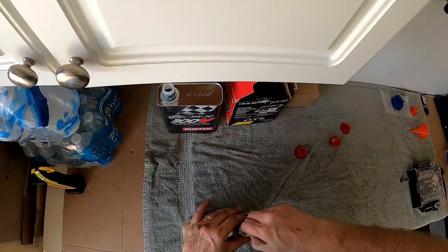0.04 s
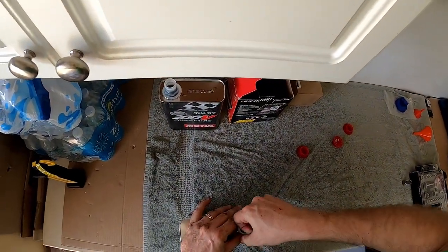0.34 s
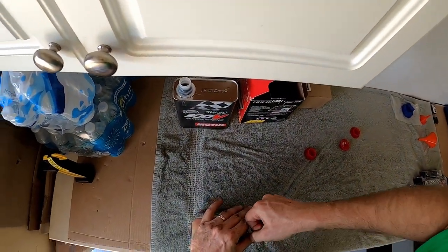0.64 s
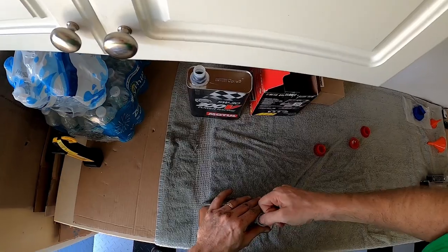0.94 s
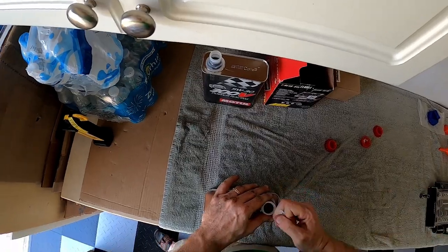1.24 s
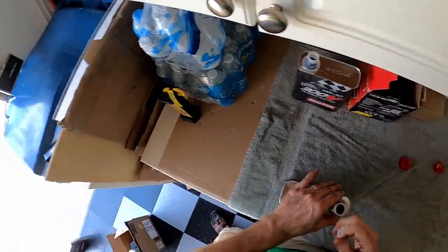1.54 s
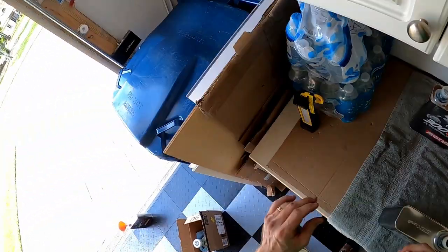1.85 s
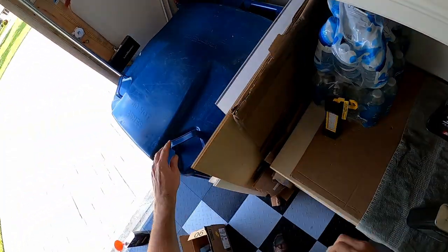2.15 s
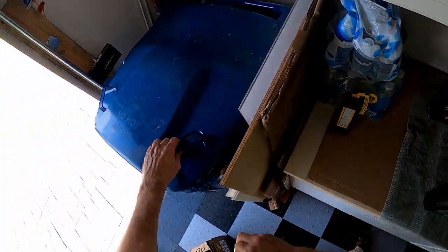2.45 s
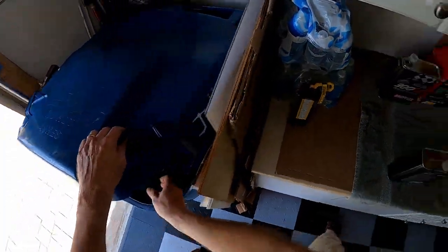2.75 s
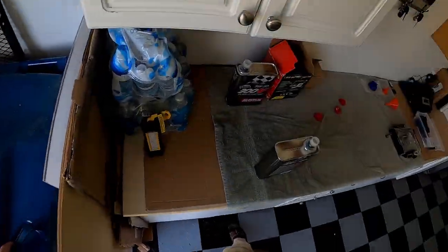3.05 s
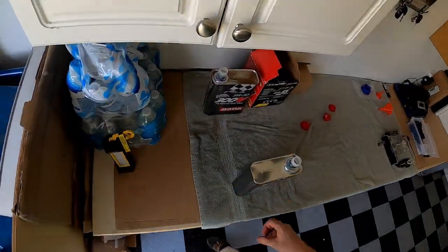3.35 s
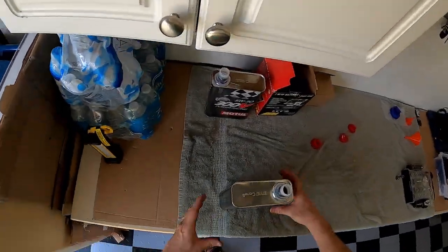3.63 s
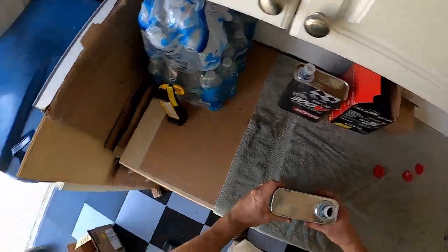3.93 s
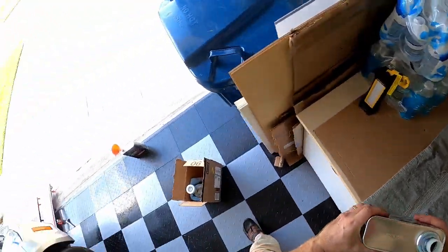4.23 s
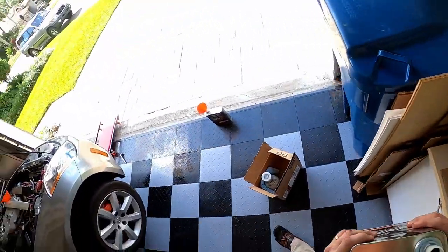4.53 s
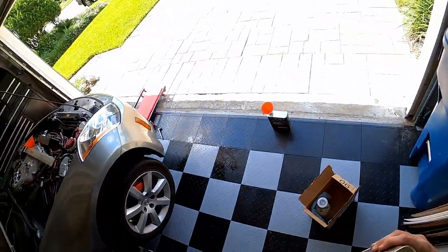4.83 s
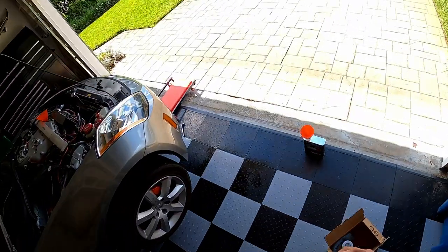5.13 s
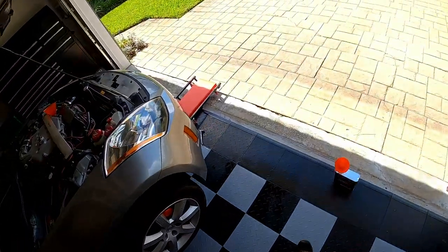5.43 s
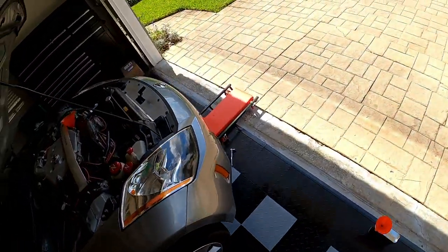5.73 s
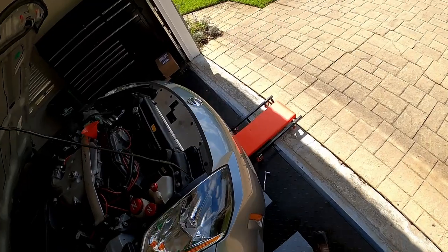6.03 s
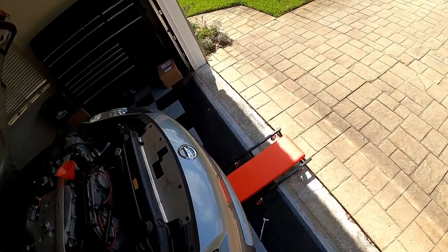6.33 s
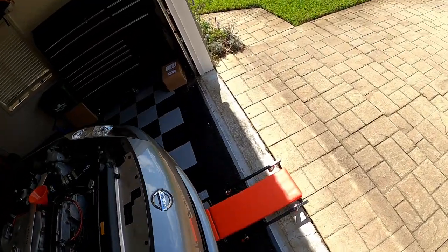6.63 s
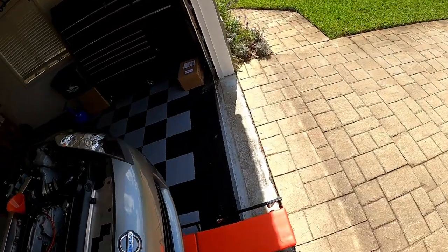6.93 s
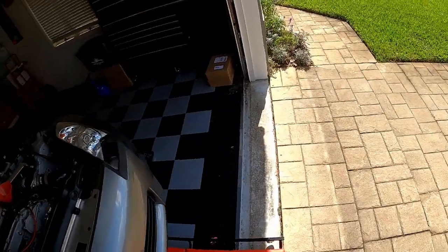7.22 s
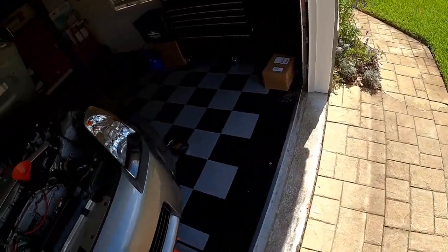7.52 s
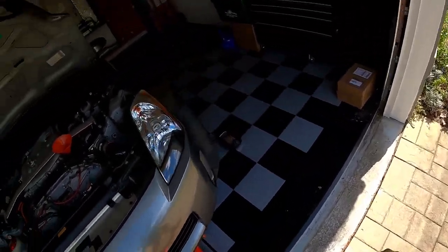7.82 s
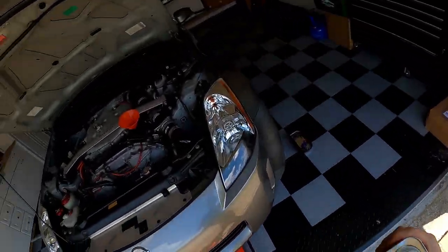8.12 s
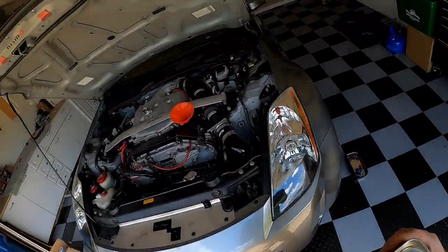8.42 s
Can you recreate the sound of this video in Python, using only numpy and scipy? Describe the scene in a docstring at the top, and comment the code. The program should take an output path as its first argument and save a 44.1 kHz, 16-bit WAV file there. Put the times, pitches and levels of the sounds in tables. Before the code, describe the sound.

In an open garage, a plastic seal scrapes faintly and tears out of a tin oil can with two close snaps, the thin metal popping. Off to the left a wheelie bin booms hollowly, then its lid slams and bounces. The can pops again in the hand and is carried along with small ticks and dull footsteps. A body-worn microphone also picks up clothing swishes, puffs of wind, distant traffic and faint birds.

```python
"""An open garage, heard from a body-worn microphone. Close by, on a workbench, the plastic seal of a tin
oil can scrapes and tears out of the spout. It is dropped into a wheelie bin further off to the left,
whose lid slams, clattering over the boom of the hollow body. The can is carried to the door, its thin
walls popping in the grip, with finger ticks and dull footsteps. Clothing swishes, distant traffic and
birds come in from outside, and puffs of wind brush the microphone's ports."""
import numpy as np
from scipy import signal
from scipy.fft import rfft, irfft, next_fast_len
import sys
import numpy as np
from scipy import signal
from scipy.fft import rfft, irfft, next_fast_len
from scipy.io import wavfile

SR = 44100
rng = np.random.default_rng(int(sys.argv[2]) if len(sys.argv) > 2 else 0)


def to_wav(s):
    """Save 16-bit WAV."""
    ch = np.atleast_2d(s).T  # columns
    pcm = np.round(np.clip(ch, -1, 1) * 32767)  # PCM
    wavfile.write(sys.argv[1], SR, pcm.astype(np.int16))


N = 382347
TIME = np.arange(N) / SR
AGE = np.arange(SR // 2) / SR   # seconds since a blow

# the outdoors, louder when the doorway is near and faced: time_s, gain_db
DOORWAY = [(0, 3), (1.2, -2.5), (2.3, 4.5), (3.7, -1.5), (4.8, 5.5), (7.7, 10), (8.3, 6.5), (8.67, 7.5)]
# distant traffic and its low rumble: freq_hz, level_db
TRAFFIC = [(160, -36), (280, -35.5), (476, 4), (763, 1.5), (1030, 1.5), (1570, -10.5), (2490, -17.5),
           (3600, -48), (7000, -110)]
RUMBLE = [(20, -2), (45, 2.5), (76, 1), (103, -6), (139, -2), (180, -7.5), (244, -10.5), (350, -13.5),
          (500, -25.5), (1500, -120)]
# clothing rubs as the arms and body move: start_s, length_s, level_db
SWISHES = [(.26, 0.16, -63), (.44, 0.4, -47.5), (1.45, 0.28, -54), (2.68, 0.3, -54.5), (4.48, 0.25, -58),
           (4.8, 0.26, -53.5), (5.3, 0.74, -60), (6.75, 0.23, -56.5), (7.52, 0.55, -57), (8.47, 0.23, -49)]
# hiss of cloth and still air: freq_hz, level_db
HISS = [(1000, 3), (2300, 2.5), (2900, -2), (3900, 0.5), (4700, -2), (5500, -4.5), (7400, -12), (8600, -17),
        (10000, -20), (12500, -28.5), (16000, -66)]
# two low thumps of footsteps, then puffs of wind: start_s, length_s, level_db
THUMPS_AND_PUFFS = [(4.63, 0.032, -34.5), (5.11, 0.015, -35), (6.13, 0.12, -25.5), (6.28, 0.23, -22),
                    (6.75, 0.01, -20.5), (6.92, 0.14, -32.5)]
# low buffeting at the ports: freq_hz, level_db
BUFFETING = [(20, 6), (55, 5.5), (120, 1), (220, -11.5), (350, -20), (600, -53), (3000, -120)]

# a can wall buckles in the grip: start_s, level_db, pitch_hz, crackle_db
POPS = [(.027, -32, 521, -38.5), (.846, -12.5, 683, -27.5), (.869, -7.5, 593, -24.5), (.910, -22, 702, -38),
        (.945, -22.5, 559, -41), (4.007, -25.5, 540, -59), (4.033, -9, 527, -30),
        (4.762, -34.5, 523, -41.5), (4.919, -32.5, 657, -40), (5.595, -22.5, 467, -35),
        (5.708, -24, 523, -39), (5.809, -34, 537, -55), (6.204, -28.5, 588, -43), (6.307, -21.5, 680, -34),
        (8.42, -18, 633, -30.5)]
# modes of the tin wall: pitch_ratio, level_db, t60_s
WALL_MODES = [(.78, -22, .07), (1, 0, .06), (1.22, -13, .07), (1.42, -9, .05), (1.57, -9, .05),
              (1.88, -18, .06), (2.32, -12, .08), (2.8, -22, .04)]
# crackle of buckling tin: freq_hz, level_db
CRACKLE = [(250, -2.5), (450, 11.5), (900, 0), (1300, -5.5), (1700, -9), (2500, -15), (3200, -31.5),
           (5500, -32.5), (9000, -38.5), (15000, -59)]
# bird calls outside: start_s, top_pitch_hz, level_db, slur_share_of_pitch
BIRD_CALLS = [(0.118, 4170, -45.5, 0.13), (0.551, 4130, -41, 0.13), (1.14, 3800, -42.5, 0.075),
              (1.92, 3956, -45, 0.19), (2.085, 3440, -45.5, 0.13), (2.215, 3460, -44.5, .17),
              (2.478, 3210, -45, 0.17), (4.15, 2030, -49.5, 0.103), (4.765, 2340, -43, 0.1),
              (7.315, 2274, -49.5, 0.15), (7.668, 2426, -47.5, 0.17)]
# thin high ringing in the scrape: freq_hz, level_db, t60_s
SCRAPE_RING = [(3130, -14, .04), (4000, 1, 0.035), (4640, 9, .025), (5490, 4, 0.083), (6570, -8, 0.066),
               (7260, -11, .05), (9800, -12.5, .03)]
# fingertips on the tin: start_s, level_db
TICKS = [(.265, -37), (3.677, -35.5), (5.257, -35), (5.649, -35.5), (6.287, -34), (6.357, -47),
         (6.825, -38.5), (6.876, -42), (6.93, -37), (7.41, -37.5), (7.881, -35.5), (8.4233, -20.5)]
# dull knocks of footsteps and handling: start_s, level_db, pitch_hz
KNOCKS = [(2.148, -32, 670), (2.288, -32, 496), (6.011, -36, 870), (6.908, -27, 1500), (7.137, -31, 1100),
          (7.35, -23.5, 497), (7.9121, -17.5, 1490)]
# body of a tick or knock: pitch_ratio, level_db
KNOCK_BODY = [(.2, -36), (.5, 1), (1, 3), (1.3, -1), (2.2, -17), (8, -55)]
# bright edge of a finger tick or a lid crack: freq_hz, level_db
BRIGHT_EDGE = [(1200, -16), (2600, 21), (4500, 17), (7000, 6), (10000, -1), (15000, -74)]

# the seal tears: start_s, snap_db, spout_pitch_hz, ring_db, bench_thud_db, room_send_db
TEARS = [(0.829, -12.5, 3310, -19, -17, -16), (1.335, -14.5, 1158, -14, -19, -7.5)]
# snap of the plastic: freq_hz, level_db
SNAP = [(200, -17), (550, 12), (800, -4.5), (1100, 9), (1900, -8), (2400, 3), (2900, -6), (3500, -1),
        (4300, -17), (5600, -33), (9000, -13), (11500, -25.5), (14000, -39), (16000, -76)]
# the spout's noisy resonance: pitch_ratio, level_db
SPOUT_BAND = [(.6, -59), (.88, -15), (1, 3.5), (1.2, -6.5), (1.6, -19.5), (2.05, -16), (2.4, -45),
              (3.3, -36), (4.5, -18.5), (5.8, -30), (7.5, -34), (13, -85)]
# the spout's clear tones: pitch_ratio, level_db, t60_cycles
SPOUT_MODES = [(1.001, -5, 300), (1.151, -6.5, 130), (2.02, -8, 87)]
# modes of the workbench: freq_hz, level_db, t60_s
BENCH_MODES = [(78, 9, 0.062), (119, -5, 0.082), (151, -6, 0.16), (232, -12.5, 0.048), (300, -11, 0.046)]
# the can rocks back on the bench: start_s, level_db
CAN_ROCK = [(0.87, -14)]

# the hollow bin booms: start_s, level_db, length_s
BOOMS = [(2.404, -13.5, .105), (2.605, -14.5, 0.058), (3.192, -17, 0.076), (3.273, -12.5, .055)]
# modes of the air in the bin: freq_hz, level_db, t60_s
BIN_MODES = [(59.3, 1.5, 0.52), (119, -19, .25), (174.5, -19, 0.6), (331, -33, .05)]
# the lid is lifted, let go and bounces: start_s, clatter_db, thud_db
LID_BLOWS = [(2.404, -58, -20.5), (2.598, -34, -34), (2.626, -48.5, -31.5), (3.154, -35.5, -50),
             (3.17, -19, -35), (3.185, -27, -22), (3.265, -23.5, -33), (3.2996, -18.5, -22),
             (3.315, -18, -16), (3.33, -36, -25)]
# thud of the bin walls and clatter of the lid: freq_hz, level_db
THUD = [(25, -12.5), (50, 5), (90, -1), (135, 3.5), (185, -3), (260, -13), (380, -10), (550, -35.5),
        (1500, -67.5)]
CLATTER = [(70, 7), (150, 11), (300, 3), (600, 3.5), (950, 4.5), (1400, -2), (1800, -2), (2300, -2.5),
           (3000, -19), (5000, -18.5), (7500, -63), (11000, -36.5), (16000, -65)]
# modes of the lid panel: freq_hz, level_db, t60_s
LID_MODES = [(406, 0.5, .16), (507, 1, 0.14), (918, -4.5, 0.16), (1145, -2.5, 0.18), (1725, -11, .07),
             (2410, -1.5, 0.083)]

# stereo width of the open air and of the garage: freq_hz, side_minus_mid_db
AIR_WIDTH = [(30, -24), (120, -25), (400, -14), (1000, -10.5), (3000, -5), (8000, -0.5)]
ROOM_WIDTH = [(60, -44), (400, -18), (1000, -6), (3000, -4), (8000, 2.5)]
# decay of the garage: freq_hz, t60_s
ROOM_T60 = [(60, 0.46), (350, 0.43), (1200, 0.54), (4500, 0.58), (12000, 0.37)]
# colour of its reflections: freq_hz, level_db
ROOM_COLOUR = [(60, 14.5), (250, 15.5), (600, 1.5), (1300, 7.5), (5000, 3.5), (12000, -1.5)]
# where the can and the bin sit at the microphone: freq_hz, left_minus_right_db
CAN_SIDE = [(200, -9), (600, 0.5), (2500, 3), (5000, -2.5), (9000, -5)]
BIN_SIDE = [(80, 0), (300, 1), (900, 5.5), (2500, 9), (6000, 4), (11000, 0.5)]


def from_db(db):
    """Decibels to gain."""
    return 10 ** (np.asarray(db) / 20)


def at_hz(points, hz):
    """Read a table on a log-frequency axis."""
    freqs, values = np.transpose(points)
    return np.interp(np.log(np.maximum(hz, 1)), np.log(freqs), values)


def colour(x, spectrum, power=1, size=8192):
    """Minimum-phase filter with the given response, raised to a power."""
    gain = from_db(at_hz(spectrum, np.arange(size // 2 + 1) * SR / size))
    cepstrum = irfft(power * np.log(gain))
    cepstrum[1:size // 2] *= 2
    cepstrum[size // 2 + 1:] = 0
    return signal.fftconvolve(x, irfft(np.exp(rfft(cepstrum))))[:len(x)]


def noise(spectrum, count=N):
    """Coloured noise of rms 1."""
    size = next_fast_len(count)
    gain = from_db(at_hz(spectrum, np.linspace(0, SR / 2, size + 1)))
    x = irfft(rfft(rng.standard_normal(2 * size)) * gain)[:count]
    return x / np.std(x)


def wide_noise(spectrum, width, count=N):
    """Diffuse sound: alike at both ports in the bass, unrelated in the treble."""
    mid, side = noise(spectrum, count), colour(noise(spectrum, count), width)
    return np.array([mid + side, mid - side])


def fade(t60, hold=0):
    """Steady while driven, then dying away."""
    return from_db(-60 * np.maximum(AGE - hold, 0) / max(t60, 1e-3))


def swells(rows, attack_s, release_s):
    """Each swell rises, holds for its length and dies away; their powers add."""
    power = 0
    for s, length, db in rows:
        rise = np.clip((TIME - s) / attack_s + .5, 0, 1)
        fall = np.exp(-np.maximum(TIME - s - length, 0) / release_s)
        power += (from_db(db) * rise * fall) ** 2
    return np.sqrt(power)


def even_rattle(envelope, passes=3):
    """Noise under an envelope, evened out so that no single pitch stands out."""
    x, norm = rng.standard_normal(len(envelope)), np.linalg.norm(envelope)
    for _ in range(passes):
        flat = irfft(np.exp(1j * np.angle(rfft(x * envelope))), len(envelope))
        x = np.clip(flat * norm / (envelope + 1e-9), -2, 2)
    return x * envelope * norm / np.linalg.norm(x * envelope)


def burst(spectrum, t60, hold=0, rise_s=0.00032):
    """Many close modes struck together: a short coloured rattle that starts near rms 1."""
    gain = from_db(at_hz(spectrum, np.linspace(0, SR / 2, len(AGE))))
    rattle = even_rattle(fade(t60, hold) * np.minimum(AGE / rise_s, 1))
    return colour(rattle, spectrum) / np.sqrt(np.mean(gain ** 2))


def ring(modes, pitch=1, hold=0, spread_db=2.0):
    """Damped modes; each blow shares its strength among them a little differently."""
    out = 0
    for k, (hz, db, t60) in enumerate(modes):
        strength = (-1) ** k * from_db(db + spread_db * rng.standard_normal())
        out += strength * np.sin(2 * np.pi * hz * pitch * AGE) * fade(t60, hold)
    return out


def add(track, s, sound):
    """Mix a sound in at s seconds."""
    start = max(round(s * SR), 0)
    track[start:start + len(sound)] += sound[:N - start]


def doorway_db():
    """Gain of the outdoors as the microphone moves and turns."""
    return np.interp(TIME, *np.transpose(DOORWAY))


def traffic(threshold_s=7.59, passing_s=1.09, hum_hz=232):
    """Distant traffic and a faint wavering hum; the rumble swells once, on passing the threshold."""
    waver = 1 + .5 * noise([(3, 7), (30, -75), (300, -120)])
    hum = from_db(-57.5) * np.sin(2 * np.pi * hum_hz * TIME) * waver
    rumble_db = -45.5 + 9 / (1 + ((TIME - threshold_s) / passing_s) ** 2)
    rumble = from_db(rumble_db) * wide_noise(RUMBLE, AIR_WIDTH)
    road = from_db(-58 + doorway_db()) * wide_noise(TRAFFIC, AIR_WIDTH)
    return rumble + road + hum


def rubbing(shift_db=2.8, catches_per_s=500, catch_spread_db=5, grit_db=-4):
    """Fibres slide and catch in tiny grains, while the colour shifts band by band; rms 1."""
    catches = (rng.random((2, N)) < catches_per_s / SR) * rng.choice([-1, 1], (2, N))
    strength = from_db(catch_spread_db * np.clip(rng.standard_normal(N), -2, 2))
    grit = np.array([colour(side, HISS) for side in catches * strength])
    rest = wide_noise(HISS, AIR_WIDTH) + from_db(grit_db) * grit / np.std(grit)
    out = 0
    for top_hz in (2500, 4000, 6000, 9000, 17000):
        band = signal.sosfiltfilt(signal.butter(4, top_hz, fs=SR, output="sos"), rest)
        out += band * from_db(shift_db * noise([(8, 0), (40, -40), (200, -120)]))
        rest = rest - band
    return out / np.std(out)


def clothing():
    """Gritty swishes of cloth right by the microphone, over a hiss that lifts a little at the door."""
    hiss = from_db(-63 + 0.2 * doorway_db()) * wide_noise(HISS, AIR_WIDTH)
    return hiss + swells(SWISHES, attack_s=0.065, release_s=0.1) * rubbing()


def wind_and_steps(lumpy_db=4.5):
    """Two footstep thumps and puffs of wind on a breeze that grows at the door, mostly on the left."""
    breeze = from_db(-60 + 1.36 * doorway_db())
    surges = swells(THUMPS_AND_PUFFS, attack_s=0.097, release_s=0.041)
    lumps = from_db(lumpy_db * noise([(25, -9.5), (100, -29.5), (400, -90)]))
    buffeting = noise(BUFFETING)
    left = from_db(1) * buffeting
    right = from_db(-14) * buffeting + from_db(-8) * noise(BUFFETING)
    return np.hypot(breeze, surges) * lumps * np.array([left, right])


def can_walls(buckle_s=.011, crackle_t60=0.16, rise_s=0.0027):
    """A tin wall is driven while it buckles, then the oil and the hand damp it quickly."""
    out = np.zeros(N)
    for s, db, hz, crackle_db in POPS:
        hold = buckle_s * np.exp(.04 * (-25 - db))   # weaker pops give way more slowly
        tone = from_db(db - 7.5) * ring(WALL_MODES, hz, hold) * np.minimum(AGE / rise_s, 1)
        crackle = from_db(crackle_db + 4) * burst(CRACKLE, crackle_t60, hold / 2, rise_s)
        add(out, s, tone + crackle)
    return out


def birds(call_s=.06, top_at=.15, clear_share=.25, scatter_db=5, scatter_build_s=.02):
    """Calls start clear, hook over their top pitch and slur down raspily; houses and trees scatter them."""
    calls = np.zeros(N)
    progress = np.minimum(AGE / call_s, 1)
    envelope = np.sqrt(np.abs(np.sin(np.pi * progress)))
    fall = np.sin(np.pi / 2 * (progress - top_at) / (1 - top_at)) ** 2
    rasp = 0.08 * np.sqrt(np.maximum(progress - clear_share, 0))
    for s, hz, db, slur in BIRD_CALLS:
        pitch = hz * (1 - slur * fall + rasp * noise([(500, 0), (1500, -40)], len(AGE)))
        add(calls, s, from_db(db) * envelope * np.sin(2 * np.pi * np.cumsum(pitch) / SR))
    echoes = rng.standard_normal((2, len(AGE))) * fade(t60=.55) * np.minimum(AGE / scatter_build_s, 1)
    scattered = signal.fftconvolve(calls[None], echoes / np.linalg.norm(echoes[0]), axes=1)[:, :N]
    return calls + from_db(scatter_db) * scattered


def seal_scrape(start_s=0.21, length_s=0.76, level_db=-62, slips_per_s=220, uneven_db=4):
    """The stretched plastic slips in tiny jerks with a thin high ringing, louder as the pull grows."""
    slips = (rng.random(N) < slips_per_s / SR) * from_db(uneven_db * rng.standard_normal(N))
    ringing = signal.fftconvolve(slips, ring(SCRAPE_RING))[:N]
    pull = swells([(start_s, length_s, level_db)], attack_s=length_s / 2, release_s=0.1)
    return pull * ringing / np.std(ringing)


def knock(hz, rattle_t60=0.034, knock_t60=0.0018):
    """A quickly damped knock inside a short rattle."""
    rattle = burst([(hz * ratio, db) for ratio, db in KNOCK_BODY], rattle_t60)
    return rattle / 2 + ring([(hz, -5, knock_t60)])


def ticks_and_knocks(tick_hz=1630, ring_hz=548, walk_s=(4.4, 8.2), faint_count=8, faint_db=-40):
    """Fingertips tick on the tin; footsteps and handling give dull knocks with a faint ring."""
    out = np.zeros(N)
    faint = [(s, faint_db) for s in rng.uniform(*walk_s, faint_count)]   # the grip shifts on the walk
    for s, db in TICKS + faint:
        add(out, s, from_db(db) * (knock(tick_hz) + from_db(-16) * burst(BRIGHT_EDGE, t60=0.12)))
    for s, db, hz in KNOCKS:
        add(out, s, from_db(db) * (knock(hz) + from_db(-17) * ring(WALL_MODES, ring_hz)))
    return out


def seal_tears(spout_t60_cycles=75):
    """Each tear snaps and rings the spout; gives the close sound and what the room gets."""
    close, to_room = np.zeros(N), np.zeros(N)
    for s, snap_db, hz, ring_db, _, room_db in TEARS:
        band = [(hz * ratio, db) for ratio, db in SPOUT_BAND]
        modes = [(hz * ratio, db, cycles / (hz * ratio)) for ratio, db, cycles in SPOUT_MODES]
        spout = burst(band, spout_t60_cycles / hz, rise_s=0.00186)
        spout += from_db(-7) * ring(modes, spread_db=1)
        crack = from_db(snap_db) * burst(SNAP, t60=0.025, hold=0.0004) + from_db(ring_db) * spout
        add(close, s, crack)
        add(to_room, s, from_db(room_db) * crack)
    return close, to_room


def bench(lag_s=0.0044, lowest_hz=55):
    """The workbench thuds just after each tear and when the can rocks back."""
    out = np.zeros(N)
    recoils = [(s + lag_s, thud_db) for s, _, _, _, thud_db, _ in TEARS]
    for s, db in recoils + CAN_ROCK:
        add(out, s, from_db(db) * ring(BENCH_MODES, spread_db=4.5))
    return signal.sosfilt(signal.butter(2, lowest_hz, "high", fs=SR, output="sos"), out + 1e-18)


def bin_boom(swell_s=0.015, damped_t60=.05):
    """The air in the bin swings for a few cycles until the hand or the rim stops it short."""
    out = np.zeros(N)
    for s, db, length in BOOMS:
        envelope = np.minimum(AGE / swell_s, 1) * fade(damped_t60, length)
        add(out, s, from_db(db) * ring(BIN_MODES, spread_db=2.5) * envelope)
    return out


def bin_lid(detune=.01):
    """Each blow thuds in the bin walls and cracks and clatters in the lid."""
    thud, clatter = np.zeros(N), np.zeros(N)
    for s, clatter_db, thud_db in LID_BLOWS:
        add(thud, s, from_db(thud_db) * burst(THUD, t60=0.26))
        # the lid bends, so it rings a little differently each time
        clack = ring(LID_MODES, pitch=1 + detune * rng.standard_normal())
        add(clatter, s, from_db(clatter_db) * (burst(CLATTER, t60=0.13) + from_db(-11) * clack))
        crack_db = -17 + 0.58 * clatter_db
        add(clatter, s, from_db(crack_db) * burst(BRIGHT_EDGE, t60=0.038))
    return thud, clatter


def garage(x, delay_s=0.0019, build_s=0.0041):
    """Diffuse reflections that build up, then die away octave by octave."""
    age = np.arange(SR) / SR
    diffuse, tail = wide_noise(ROOM_COLOUR, ROOM_WIDTH, SR), 0
    for hz in np.geomspace(50, 12800, 9):
        octave = signal.butter(2, [hz / np.sqrt(2), hz * np.sqrt(2)], "band", fs=SR, output="sos")
        tail += signal.sosfilt(octave, diffuse) * from_db(-60 * age / at_hz(ROOM_T60, hz))
    tail *= np.clip((age - delay_s) / build_s, 0, 1)
    return signal.fftconvolve(x[None], tail / np.sqrt(np.sum(tail ** 2) / 2), axes=1)[:, :N]


def from_side(x, balance):
    """The microphone's body shades the far port."""
    return np.array([colour(x, balance, 1 / 2), colour(x, balance, -1 / 2)])


def at_ports(x):
    """The left port hears one sample after the right."""
    return np.array([np.pad(x[0], (1, 0))[:N], x[1]])


def scene():
    """The can is close, the bin further off to the left, and the birds come in through the open door."""
    snaps, snaps_to_room = seal_tears()
    handling = can_walls() + ticks_and_knocks() + seal_scrape()
    bench_thud, boom = bench(), bin_boom()
    bin_thud, clatter = bin_lid()
    close_direct = from_side(snaps + handling + bench_thud, CAN_SIDE)
    bin_direct = from_side(boom + bin_thud + clatter, BIN_SIDE)
    close_to_room = snaps_to_room + from_db(-10) * bench_thud + from_db(-10.5) * handling
    bin_to_room = from_db(-19) * boom + from_db(-13) * bin_thud + from_db(-2.5) * clatter
    room = garage(close_to_room + bin_to_room)
    arriving = at_ports(close_direct + bin_direct + room + traffic())
    return arriving + from_db(-6) * birds() + clothing() + wind_and_steps()


def record(dry, bass_hz=20, stopband_hz=16600):
    """The body-worn microphone loses the deepest bass and the very top."""
    bass_cut = signal.butter(2, bass_hz, "high", fs=SR, output="sos")
    top_cut = signal.cheby2(14, 70, stopband_hz, fs=SR, output="sos")
    return signal.sosfilt(top_cut, signal.sosfilt(bass_cut, dry))


dry = scene()
out = record(dry)
to_wav(out)
```